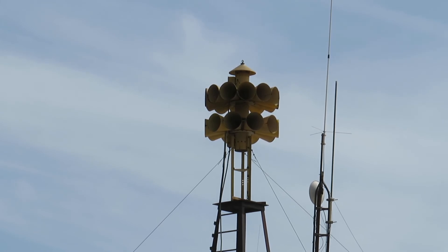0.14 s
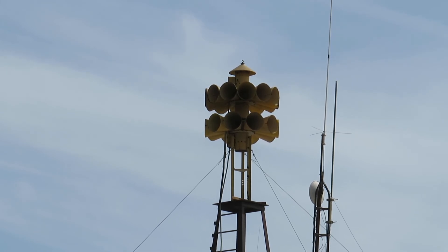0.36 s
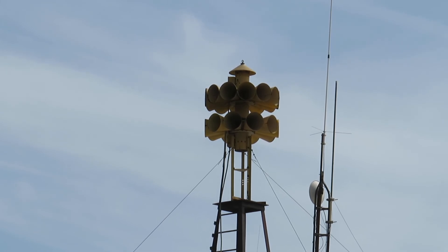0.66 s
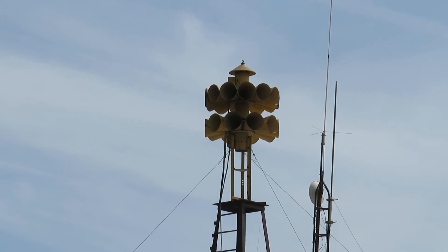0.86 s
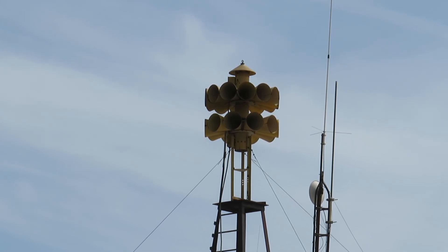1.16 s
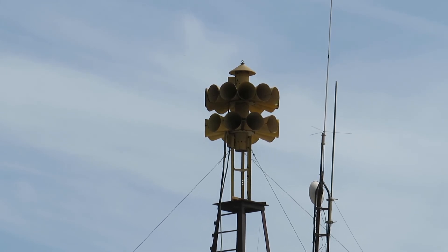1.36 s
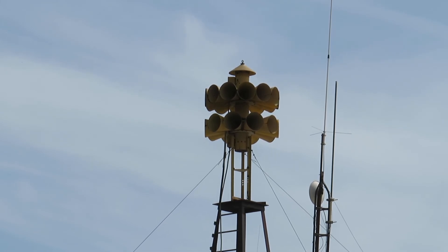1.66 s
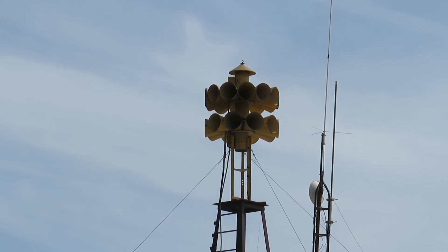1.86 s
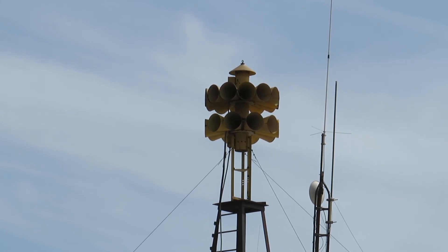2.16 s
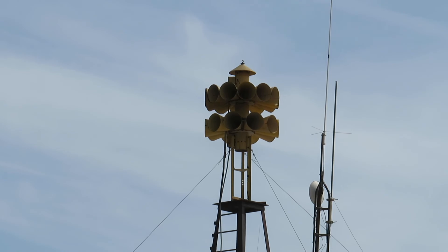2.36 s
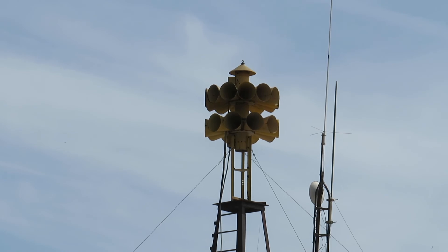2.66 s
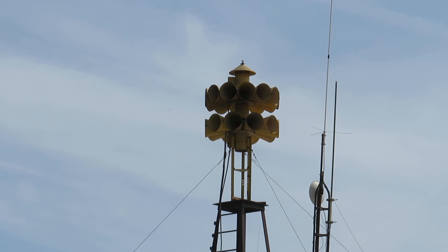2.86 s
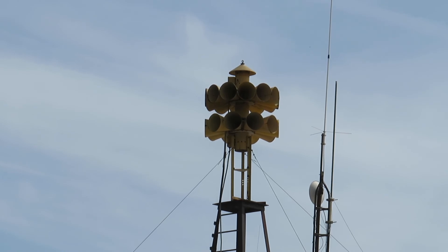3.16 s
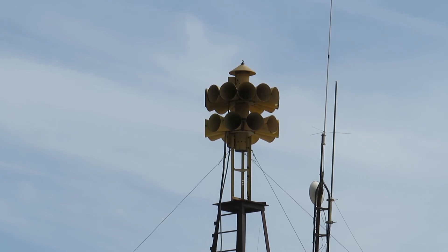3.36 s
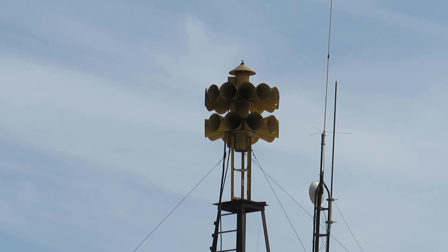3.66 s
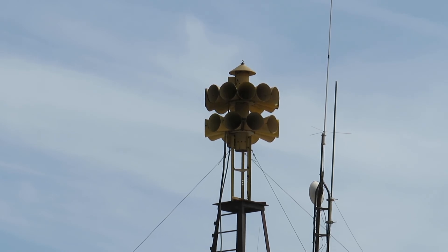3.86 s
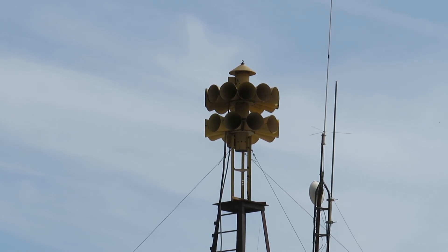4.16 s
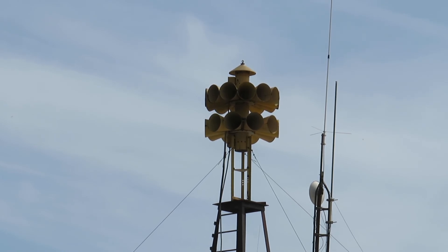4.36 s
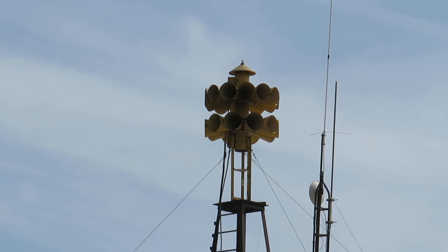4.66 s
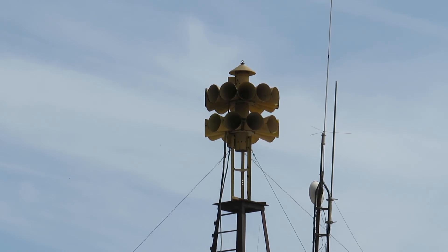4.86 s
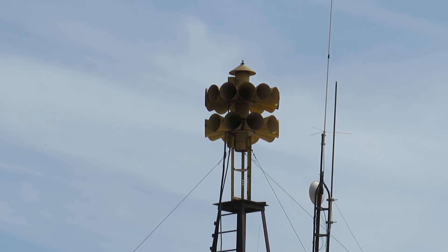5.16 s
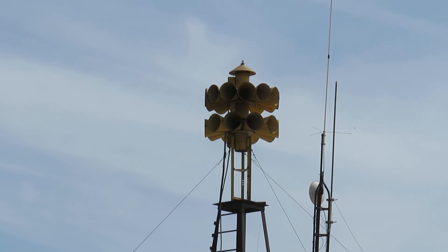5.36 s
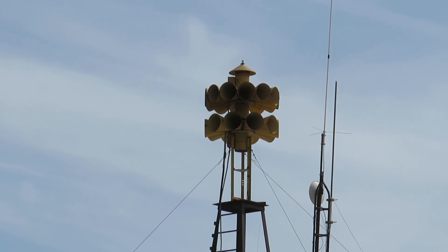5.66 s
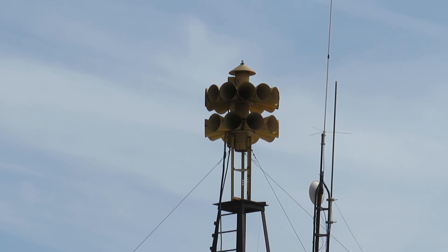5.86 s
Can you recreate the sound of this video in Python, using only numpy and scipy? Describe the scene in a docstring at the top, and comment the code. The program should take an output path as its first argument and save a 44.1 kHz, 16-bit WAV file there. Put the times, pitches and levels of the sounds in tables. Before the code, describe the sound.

Outdoors, heard on a small camera's stereo microphones. From 0 s a large diesel drones quietly: a low, steady tone near 120 Hz with a slow throb about seven times a second, over soft ground rumble, distant tyre wash and thin hiss. Sparrows chirp right at the start and near 1.6 and 1.8 s; a faint insect buzzes in short fluttering bursts until nearly 5 s. Tiny ticks fall at 0.3 s, dry clicks at 2.0-2.3 s, a stronger one at 3.6 s. Soft hums and barely audible thin squeals drift far off. The engine swells steadily, fuller from 3.7 s. From 4.2 to 5.7 s heavy wheels thump irregularly over joints, strongest around 4.8 and 5.2 s, with dull chassis ringing and loose rattling panels. The pitch sags slightly. Chirps return near 5.4 s, low wind puffs at 5.1 and 5.7 s, and the vehicle starts easing away by 6 s.

```python
"""Heavy diesel rolling past

Outdoors a sixteen-cylinder diesel passes: its exhaust drones as sines locked to the crank and throbs once a turn.
Wheels thump over joints as it comes level: noise blows ring the chassis and loose panels rattle.
Sparrows chirp, soft hums and thin squeals rise far off as gliding sines; an insect buzzes as gated narrow noise.
Shaped noise makes rumble, far tyres, hiss and a light breeze on a small camera's microphone pair; dry ticks click.
"""
import sys
import numpy as np
from scipy import signal
from scipy.fft import rfft, irfft, next_fast_len
from scipy.io import wavfile
from scipy.ndimage import uniform_filter1d, map_coordinates

SR = 44100
rng = np.random.default_rng(int(sys.argv[2]) if len(sys.argv) > 2 else 0)


def bounce(signal):
    """Save signal as a 16-bit WAV file at the path given by the first command-line argument."""
    frames = np.transpose(np.atleast_2d(signal))
    limited = np.clip(frames, -1, 1)
    pcm = np.round(limited * 32767).astype(np.int16)
    wavfile.write(sys.argv[1], SR, pcm)


N = 265570

# chassis resonances, low to high: centre_hz, width_hz, level_db
CHASSIS = [(57.7, 20, -7), (137, 21, 1.5), (228.4, 60, -2.5), (336, 92, -12.5), (465, 140, -18)]


def amp(db):
    """Decibels to a linear factor."""
    return 10 ** (np.asarray(db) / 20)


def unit(x):
    """x scaled to rms 1."""
    return x / np.sqrt(np.mean(x ** 2) + 1e-20)


def along(points, hz):
    """Read (Hz, value) points on a log frequency axis."""
    f, v = np.transpose(points)
    return np.interp(np.log(hz + 1), np.log(f + 1), v)


def curves(rows):
    """One value per sample for each column after the time."""
    s, *cols = np.transpose(rows)
    return [np.interp(np.arange(N) / SR, s, c) for c in cols]


def wobble(rate):
    """A smooth random curve, rate knots a second."""
    knots = rng.standard_normal(int(N * rate / SR) + 4)
    return map_coordinates(knots, [np.arange(N) * rate / SR])


def filtered(x, response):
    """x times a complex response of frequency."""
    m = next_fast_len(N + SR // 2)
    return irfft(rfft(x, m) * response(np.fft.rfftfreq(m, 1 / SR)), m)[..., :N]


def resonant(x, modes):
    """x through parallel resonances (centre Hz, width Hz, dB) of alternating sign."""
    def response(f):
        total = 0
        for k, (centre, width, db) in enumerate(modes):
            damping = 1j * f * width
            total = total + (-1) ** k * amp(db) * damping / (centre * centre - f * f + damping)
        return total
    return filtered(x, response)


def soft(x, corner_hz):
    """Distance and soft contact take the treble away."""
    return filtered(x, lambda f: 1 / (1 + 1j * f / corner_hz) ** 3)


def rush(spectrum, patchy_db):
    """Stereo noise of rms 1 with patches of random gain, its channels less alike toward the treble."""
    # how alike the two microphones hear: frequency_hz, likeness (0-1)
    alike = [(30, 0.95), (120, 1), (300, 0.96), (700, 0.94), (1400, 0.93), (2800, 0.77), (5600, .53),
             (10000, .22)]
    z = signal.stft(rng.standard_normal((2, N)), nperseg=512)[2]
    field = rng.standard_normal(z.shape[1:])
    field = uniform_filter1d(uniform_filter1d(field, 5, 0), 12, 1)  # smooth over pitch, then time
    pair = signal.istft(z * amp(patchy_db * unit(field)), nperseg=512)[1][:, :N]

    def mid_side(hz):
        angle = np.arccos(np.clip(along(alike, hz), -1, 1)) / 2
        return amp(along(spectrum, hz)) * [np.cos(angle), np.sin(angle)]

    mid, side = filtered(pair, mid_side)
    return unit(np.array([mid + side, mid - side]))


def whistles(notes, flutter_db, waver):
    """Sines on a flat-topped arch through three pitches, soft at both ends and slightly unsteady."""
    out, drift = np.zeros(N), 1 + waver * wobble(90)
    for s, length, crest, first, middle, last, db in notes:
        gone = np.linspace(0, 1, int(length * SR))
        u = np.interp(gone, [0, crest, 1], [-1, 0, 1])  # 0 at the middle pitch
        end_hz = np.where(u < 0, first, last)
        start = int(s * SR)
        hz = (middle + (end_hz - middle) * np.abs(u) ** 2.1) * drift[start:][:len(u)]
        swell = np.sqrt(2 * (1 - u ** 4))
        out[start:][:len(u)] += amp(db) * swell * np.sin(2 * np.pi * np.cumsum(hz) / SR)
    return out * amp(flutter_db * wobble(70))


def glides(notes):
    """Notes that slide from first to last pitch, passing halfway in the middle."""
    return [(s, length, .5, first, (first + last) / 2, last, db) for s, length, first, last, db in notes]


def echoed(x, t60, wet_db):
    """The direct sound and a decaying scatter of echoes, different in each channel."""
    t = np.arange(SR // 3) / SR
    tail = rng.standard_normal((2, len(t))) * amp(-60 * t / t60)
    tail = tail / np.linalg.norm(tail[0])
    return x + amp(wet_db) * signal.fftconvolve(x[None], tail, axes=1)[:, :N]


def nearing(closest_db, db_per_db):
    """Level in dB of a layer that grows by db_per_db for each dB of the vehicle's nearness."""
    # approach and passing: time_s, nearness_db
    nearness = [(0, -8.5), (1, -7), (2, -6.5), (3, -4), (4, -2), (5, -1), (5.5, -2), (6.03, -4)]
    return closest_db + db_per_db * curves(nearness)[0]


def exhaust():
    """Firing once per cylinder a turn; unequal cylinders add throbbing neighbour orders and weaker ones."""
    # crankshaft speed: time_s, speed_rpm
    speed = [(0, 451.5), (1.4, 458), (2.4, 450), (3.8, 451.5), (4.5, 443.5), (5.0, 440.6), (5.25, 430.3),
             (5.6, 433), (6.03, 428.3)]
    # firing tone: time_s, level_db
    firing_level = [(0, -48), (.25, -49), (.5, -41), (1.5, -43), (1.8, -37.5), (2.2, -38), (2.4, -33.5),
                    (2.8, -36), (3.3, -37), (3.6, -36.5), (3.75, -28.5), (4.15, -26.5), (4.4, -31),
                    (5, -32), (5.25, -29.5), (5.6, -29), (6.03, -35)]
    # neighbours of the firing tone: time_s, level_db
    uneven_level = [(0, -52), (2.2, -51), (3.8, -46), (4.5, -51), (6.03, -48)]
    # weaker shaft orders, multiple of the turn rate: level_db before the nearing level
    orders = {8: -7.5, 11: -4.5, 13: -4.5, 19: 0.5, 24: -7}
    cylinders = 16
    crank = 2 * np.pi * np.cumsum(curves(speed)[0]) / 60 / SR
    firing = cylinders * crank
    tone = amp(curves(firing_level)[0] + 1.5 * wobble(7)) * np.cos(firing + 0.11 * wobble(8))
    # the throb shifts between swelling and wavering in pitch
    lag = rng.uniform(0, 2 * np.pi) + 0.68 * wobble(0.78)
    below = amp(.6 * wobble(3.5)) * np.cos(firing + lag - crank)
    above = amp(-2.5 + 4.0 * wobble(12)) * np.cos(firing + lag + crank)
    # the throb comes and goes
    uneven = amp(curves(uneven_level)[0] + 2.5 * wobble(3.1)) * (below + above)
    others = np.zeros(N)
    for k, db in orders.items():
        phase = k * crank + rng.uniform(0, 2 * np.pi) + .5 * wobble(5)
        others += amp(db + 2.1 * wobble(5)) * np.cos(phase)
    shaft = amp(nearing(closest_db=-42.5, db_per_db=1.72)) * others
    sound = np.sqrt(2) * (tone + uneven + shaft)
    # small drifting differences across the pair, in level and in arrival
    level_side = (.012 + 0.013 * wobble(2.0)) * sound
    arrival_side = (2.0 + 1.2 * wobble(1.5)) * np.gradient(sound)
    side = level_side + arrival_side
    return np.array([sound + side, sound - side])


def wash():
    """Shaped noise: ground rumble, engine growl, casing roar, far tyres, hiss and microphone self-noise."""
    # spectra: frequency_hz, relative_level_db
    rumble = [(10, -50.5), (25, -6.5), (45, 9), (65, 6), (95, 10.5), (125, 10), (170, -47.5), (400, -120)]
    growl = [(40, -89), (100, 5), (130, 3.5), (200, -2.5), (280, -8), (400, -10), (520, -19), (700, -58),
             (1500, -120)]
    roar = [(250, -35), (420, -10), (566, -8), (662, -2.5), (918, -5), (1100, -14), (1430, -38.5),
            (2420, -120)]
    tyres = [(560, -38.5), (950, -11.5), (1060, 1), (1170, -2.5), (1240, 0.5), (1470, -1), (2500, -13.5),
             (3250, -49), (5500, -120)]
    hiss = [(1240, -26.5), (2100, -2.5), (2860, -1), (3220, -2), (4470, -7.5), (5280, -6.5), (7000, -23.5),
            (9100, -53), (15400, -120)]
    self_noise = [(2500, -92), (5500, -8.5), (7000, -5.5), (9000, -9.5), (11000, -13.5), (12800, -18.5)]
    # tyres on a far road: time_s, level_db
    road = [(0, -60.5), (1.6, -57), (5, -56), (6.03, -58)]
    gust = wobble(6)  # shared slow unsteadiness
    ground_db = nearing(closest_db=-43.5, db_per_db=1.03) + 1.2 * wobble(4)
    block_db = nearing(closest_db=-44, db_per_db=0.54) + 0.73 * gust
    casing_db = nearing(closest_db=-53, db_per_db=0.9) + 0.43 * gust
    road_db = curves(road)[0] + 0.25 * gust
    hiss_db = nearing(closest_db=-61.5, db_per_db=0.61) + 0.5 * gust
    return (amp(ground_db) * rush(rumble, patchy_db=1.5)
            + amp(block_db) * rush(growl, patchy_db=1.1)
            + amp(casing_db) * rush(roar, patchy_db=1.3)
            + amp(road_db) * rush(tyres, patchy_db=1.14)
            + amp(hiss_db) * rush(hiss, patchy_db=1.1)
            + amp(-77.0) * rush(self_noise, patchy_db=0.2))


def drone():
    """A narrow band of noise that drifts in pitch: slow random curves on a cosine and a sine."""
    # path of the band: time_s, centre_hz, level_db
    path = [(0, 781, -69.5), (2.6, 781.6, -66.5), (3.1, 765, -62), (3.4, 731, -65), (3.7, 770.7, -61),
            (4.3, 699.5, -67), (6.03, 700, -73)]
    width = 80  # random knots per second; more makes a wider band
    hz, db = curves(path)
    phase = 2 * np.pi * np.cumsum(hz) / SR
    return amp(db) * unit(wobble(width) * np.cos(phase) + wobble(width) * np.sin(phase))


def sparrows():
    """Each chirp is a gliding sine with a fainter second voice 1.19 times as high."""
    # chirps: start_s, length_s, middle_share (0-1), first_hz, middle_hz, last_hz, level_db
    chirps = [(.008, .012, .45, 3050, 3300, 3750, -61), (.018, .04, .2, 3700, 3740, 3500, -71),
              (.031, .036, .2, 4400, 4380, 4000, -68.5), (.059, .023, .45, 3550, 3300, 2900, -59),
              (1.565, .074, .4, 2700, 3500, 2750, -61), (1.768, .1, .27, 2800, 3430, 3220, -61.5),
              (3.795, .04, .46, 3400, 3150, 2950, -74), (4.1, .075, .46, 3500, 3650, 2900, -64),
              (5.358, .05, .46, 3100, 3480, 3300, -63), (5.408, .014, .46, 4150, 3980, 3750, -66),
              (5.524, .02, .46, 2800, 3050, 3350, -64), (5.555, .042, .46, 3400, 3480, 3050, -64.5)]
    upper = np.array(chirps) * [1, 1, 1, 1.19, 1.19, 1.19, 1]
    lower_voice = whistles(chirps, flutter_db=2, waver=.008)
    upper_voice = whistles(upper, flutter_db=4, waver=.014)
    return echoed(lower_voice + amp(-16) * upper_voice, t60=.3, wet_db=-1)


def breeze():
    """Short low buffets of air on the microphone ports, unrelated from port to port."""
    # puffs: centre_s, level_db
    puffs = [(.08, -50), (.22, -52), (5.08, -41.5), (5.74, -38)]
    # buffet spectrum: frequency_hz, relative_level_db
    buffet = [(20, -14.5), (60, 0.5), (110, 3), (200, -5.5), (350, -15), (800, -41), (2000, -120)]
    half_width_s = 0.032
    t = np.arange(N) / SR
    gusts = sum(amp(db) * np.exp(-((t - s) / half_width_s) ** 2) for s, db in puffs)
    noise = rng.standard_normal((2, N))
    return gusts * unit(filtered(noise, lambda hz: amp(along(buffet, hz))))


def insect():
    """Wing strokes about 28 times a second swell and thin a narrow resonance of noise."""
    # buzzes: start_s, level_db
    bursts = [(.13, -79), (.42, -80), (1.25, -85), (1.52, -77), (1.86, -76), (2.2, -76), (2.56, -83),
              (2.89, -77), (3.17, -81), (3.445, -80), (3.76, -76), (4.65, -81)]
    burst_s, edge_s = .16, .007
    t = np.arange(N) / SR
    gate = np.zeros(N)
    for s, db in bursts:
        to_edge_s = np.minimum(t - s, s + burst_s - t)
        gate += amp(db) * np.clip(to_edge_s / edge_s, 0, 1)
    strokes = 1 + .7 * np.cos(2 * np.pi * 28.5 * t + .8 * wobble(3))
    buzz = resonant(rng.standard_normal((2, N)), [(5480, 300, 0)])
    buzz = resonant(buzz, [(5520, 300, 0)])
    return gate * strokes * unit(buzz)


def ticks():
    """Dry clicks: fast-dying sines, each with a broad snap of noise."""
    # clicks: start_s, level_db, centre_hz, t60_ms
    clicks = [(.299, -44, 10500, 3.6), (.302, -44, 8000, 3.6), (2.004, -36, 3000, 2),
              (2.0073, -31, 1389, 4), (2.159, -36.5, 2200, 5), (2.2155, -39.5, 2650, 7),
              (2.2723, -40.5, 2690, 7), (3.592, -30, 4800, 1.5), (3.597, -26.5, 1300, 2.5),
              (5.155, -38, 2170, 4)]
    out, t = np.zeros(N), np.arange(SR // 50) / SR
    for s, db, hz, t60_ms in clicks:
        snap = np.sin(2 * np.pi * hz * t) + .15 * rng.standard_normal(len(t))
        out[round(s * SR):][:len(t)] += amp(db - 60 * t * 1e3 / t60_ms) * snap
    return echoed(soft(out, corner_hz=5540), t60=0.039, wet_db=-5.5)


def hums():
    """Soft steady or gently gliding sines."""
    # hums: start_s, length_s, first_hz, last_hz, level_db
    notes = [(.3, 0.96, 299, 299, -60.5), (1.5, 0.59, 297, 302.7, -64), (3.07, 0.088, 423, 437, -55.5),
             (3.48, .12, 632, 671, -51), (3.8, 0.25, 745, 722, -61)]
    return whistles(glides(notes), flutter_db=.8, waver=.003)


def squeals():
    """Thin, high rising sines with a flutter in level."""
    # squeals: start_s, length_s, first_hz, last_hz, level_db
    notes = [(.515, .04, 6750, 6850, -83), (.56, .07, 7350, 7650, -86), (.65, .08, 7750, 7950, -82),
             (1.32, .055, 7050, 7200, -82), (1.38, .05, 7350, 7900, -86), (1.435, .12, 8000, 8300, -83),
             (3.13, .08, 8650, 8900, -81), (3.24, .06, 8150, 8500, -84), (5.72, .05, 6750, 6800, -80)]
    return whistles(glides(notes), flutter_db=3.5, waver=.005)


def shudder():
    """Between the blows the chassis drones in lumps: noise through its upper resonances."""
    peak_s, peak_db = 5.3, -44
    swell_db_per_s, fade_db_per_s = 16, 15
    ring = resonant(rng.standard_normal((2, N)), CHASSIS[2:])
    ring = resonant(ring, [(227, 130, 0)])
    pair = ring[0] + 0.23 * np.array([ring[1], -ring[1]])
    since = np.arange(N) / SR - peak_s
    level_db = peak_db + np.minimum(swell_db_per_s * since, -fade_db_per_s * since)
    return amp(level_db + 3.0 * wobble(12)) * unit(pair)


def thumps():
    """Each wheel blow shakes the chassis; loose panels rattle a moment later."""
    # blows at the joints: start_s, level_db, rattle_db (added to level_db for the panels)
    joints = [(4.217, -28, -29.5), (4.376, -29, -21.5), (4.581, -36.5, -12.5), (4.813, -21.5, -15),
              (4.934, -27.5, -34), (4.969, -36, -12), (5.161, -23.5, -23), (5.174, -25.5, -15),
              (5.2, -31, -29), (5.322, -28.5, -23), (5.567, -27, -19.5), (5.723, -31, -34)]
    # loose panels: centre_hz, width_hz, level_db
    panels = [(510, 110, 0), (829, 100, 0), (1030, 160, -4)]
    rattle_delay_s = .027
    blows, rattles, t = np.zeros(N), np.zeros(N), np.arange(SR // 5) / SR
    for s, db, rattle_db in joints:
        push, shake = rng.standard_normal((2, len(t)))
        push = (1 - np.exp(-t / 0.0026)) * (push + 1.9 * np.exp(-t / 0.0014))  # soft onset, one-way shove
        blows[round(s * SR):][:len(t)] += amp(db + 21.5 - 60 * t / 0.1) * push
        late = round((s + rattle_delay_s) * SR)
        rattles[late:][:len(t)] += amp(db + rattle_db + 17 - 60 * t / 0.2) * shake
    body = soft(resonant(blows, CHASSIS), corner_hz=700)
    loose = soft(resonant(rattles, panels), corner_hz=2210)
    return echoed(body + loose, t60=0.86, wet_db=-21.5)


def scene():
    """Vehicle, road, birds, insect and breeze together."""
    vehicle = exhaust() + wash() + drone() + shudder() + thumps()
    far = echoed(squeals() + hums(), t60=0.24, wet_db=-13.0)
    return vehicle + sparrows() + breeze() + insect() + ticks() + far


def record(dry):
    """The camera keeps nothing above its band limit; the last few milliseconds fade out."""
    top_hz, fade_s = 12950, .004
    fade = np.clip(np.arange(N)[::-1] / (fade_s * SR), 0, 1)
    margin = SR // 8  # mirrored ends keep the filter from wrapping round
    wide = np.pad(dry * fade, ((0, 0), (margin, margin)), mode="reflect")
    kept = np.fft.rfftfreq(wide.shape[1], 1 / SR) < top_hz
    return irfft(rfft(wide) * kept, wide.shape[1])[:, margin:][:, :N]


dry = scene()
out = record(dry)
bounce(out)
```